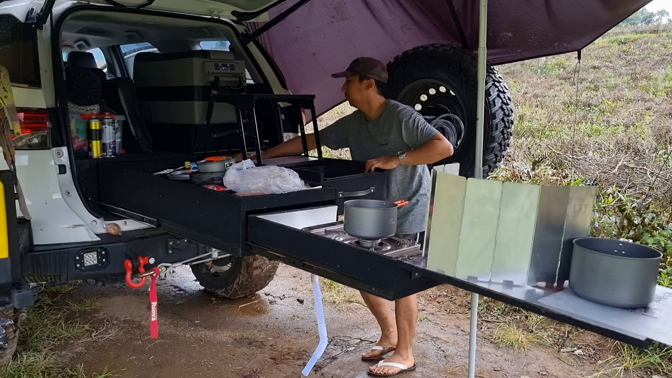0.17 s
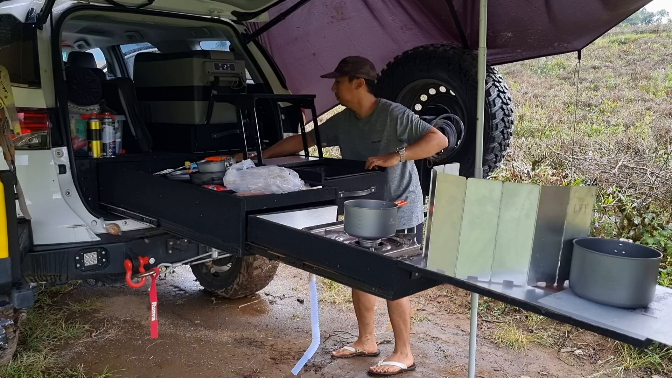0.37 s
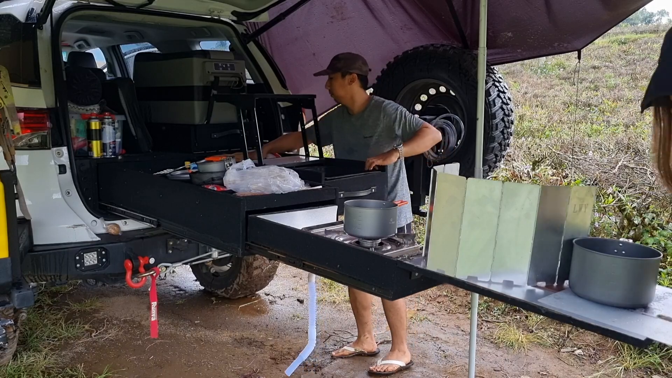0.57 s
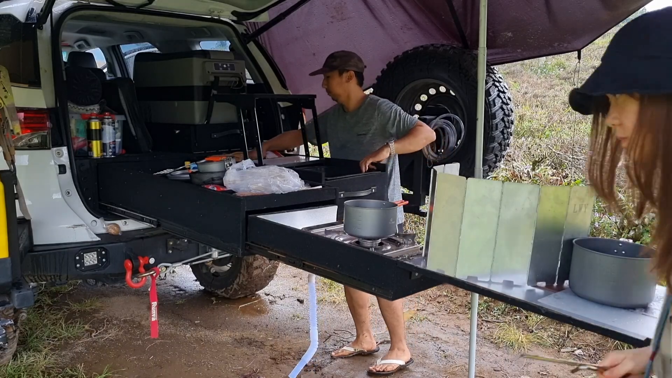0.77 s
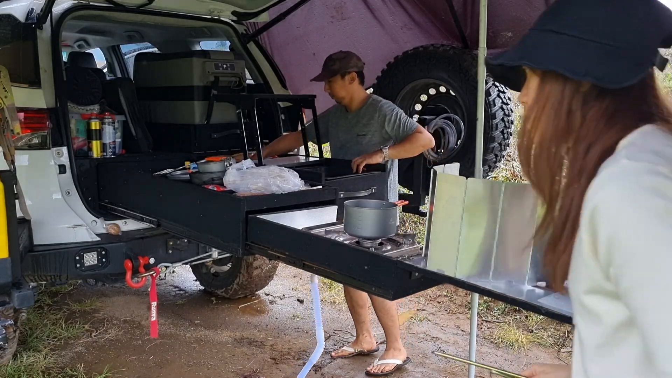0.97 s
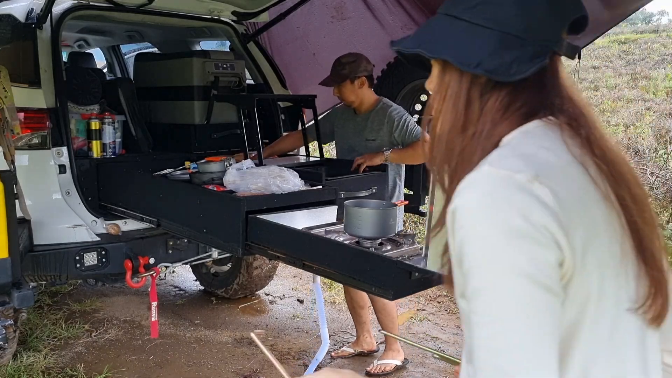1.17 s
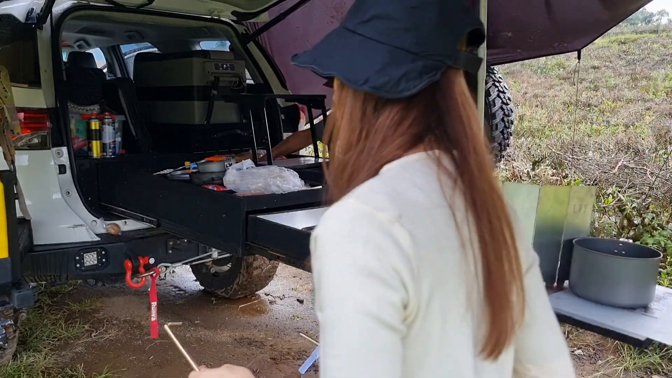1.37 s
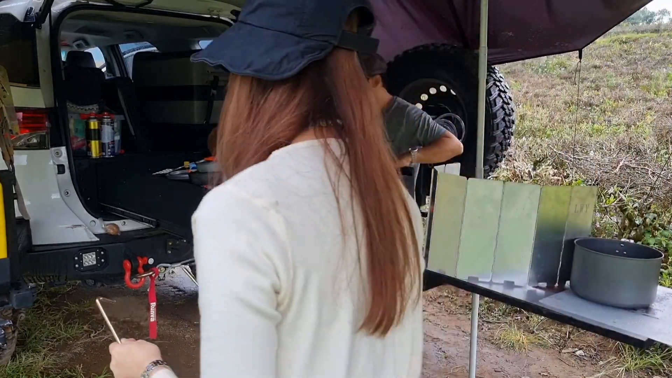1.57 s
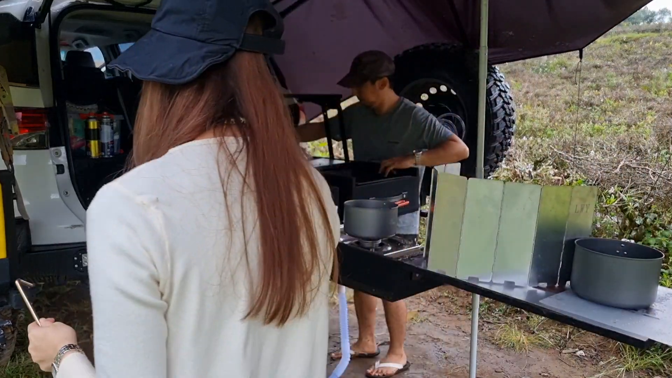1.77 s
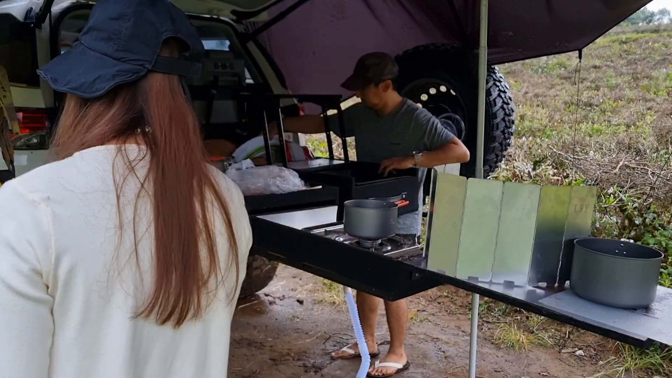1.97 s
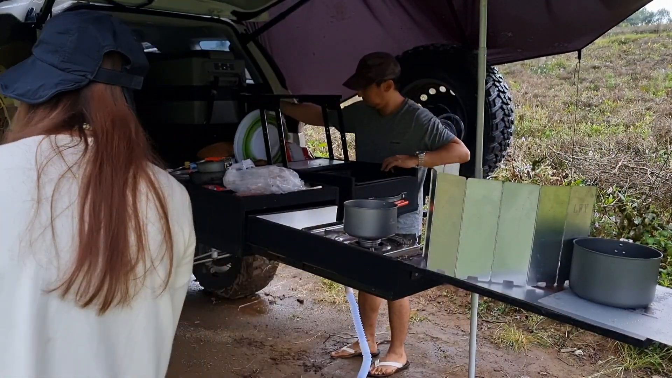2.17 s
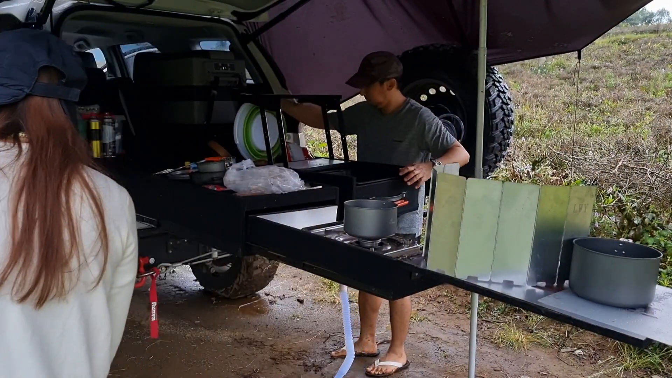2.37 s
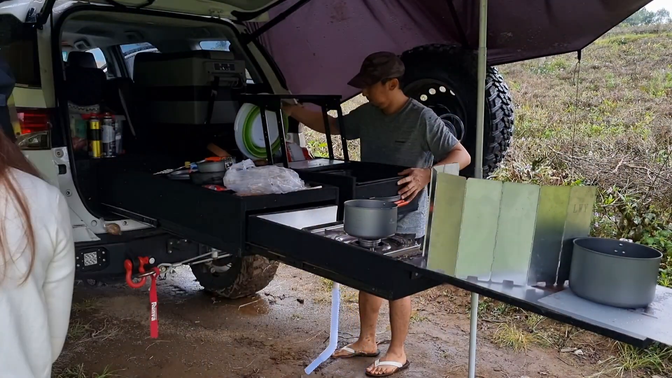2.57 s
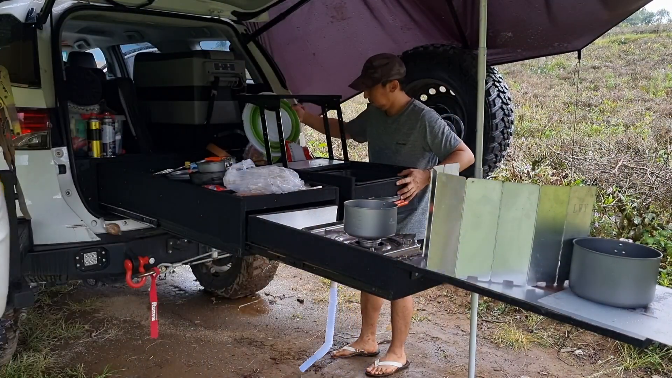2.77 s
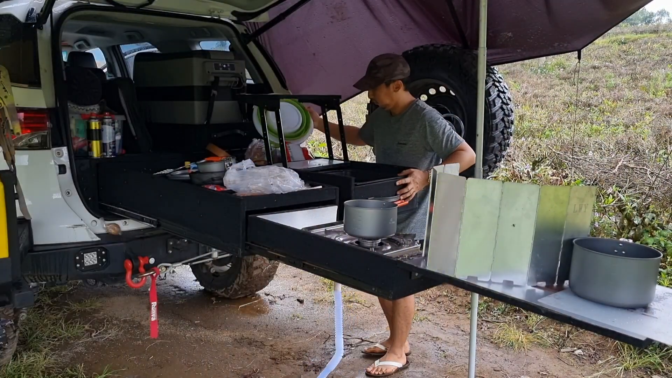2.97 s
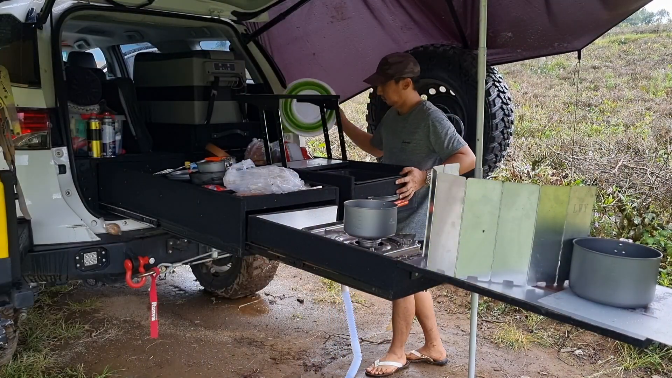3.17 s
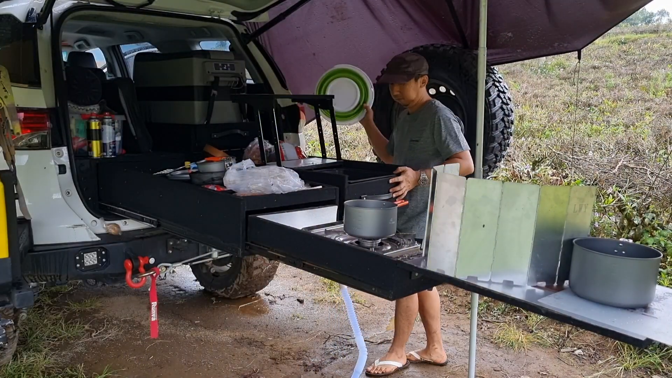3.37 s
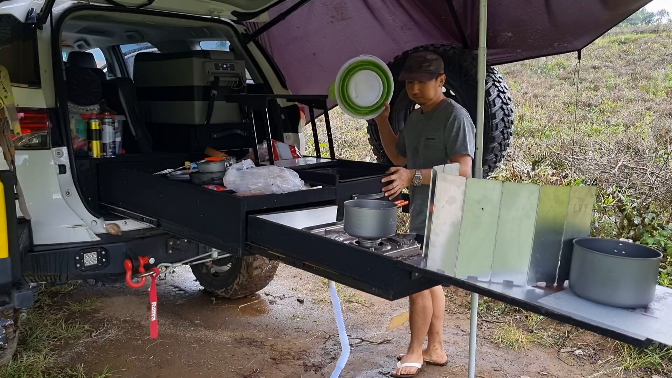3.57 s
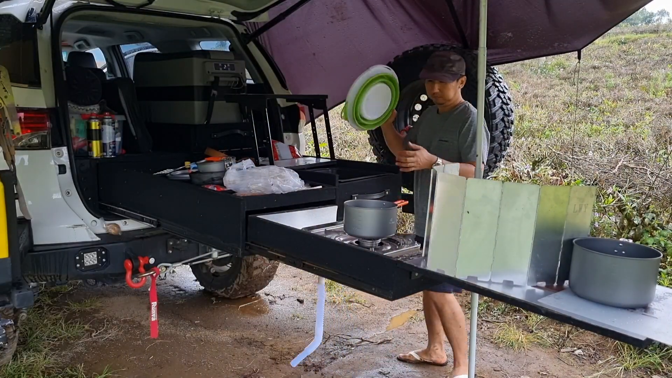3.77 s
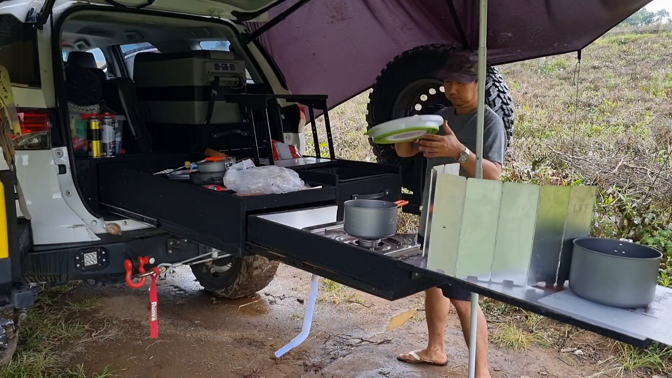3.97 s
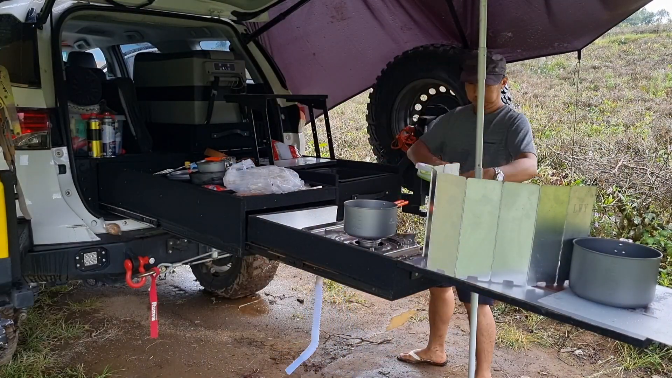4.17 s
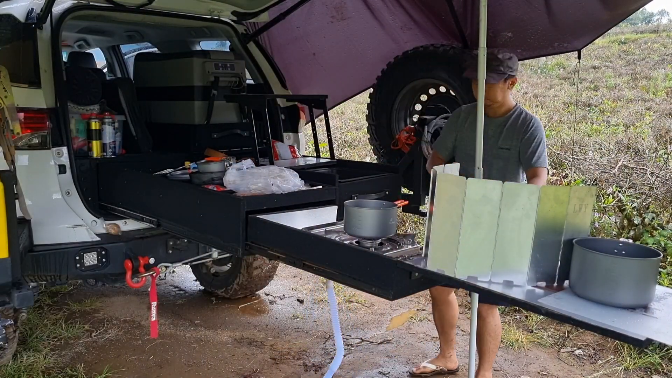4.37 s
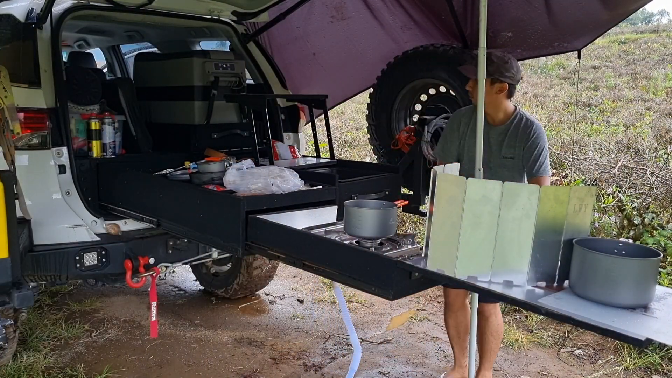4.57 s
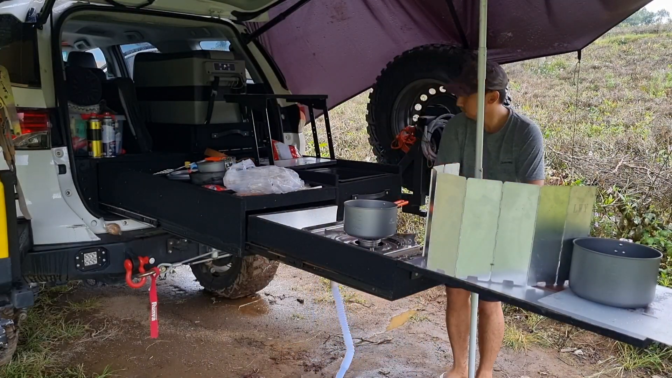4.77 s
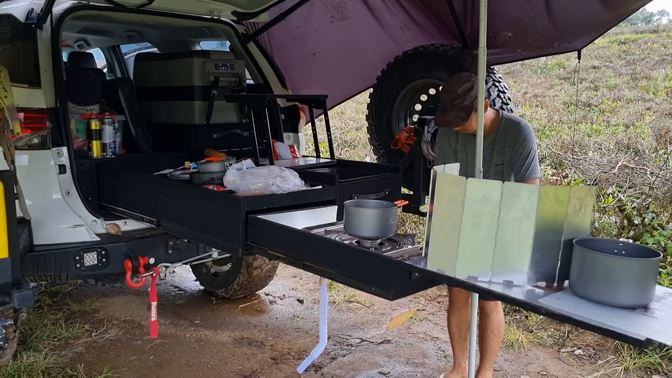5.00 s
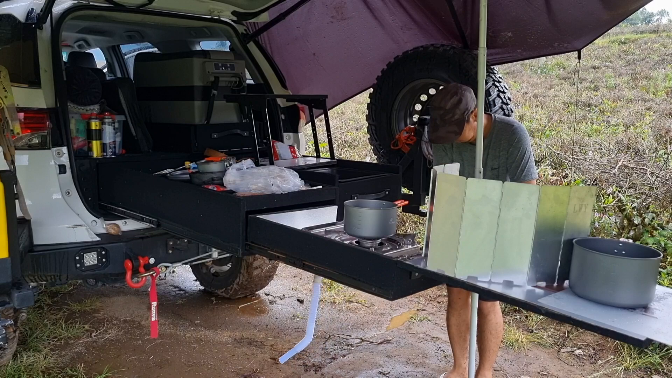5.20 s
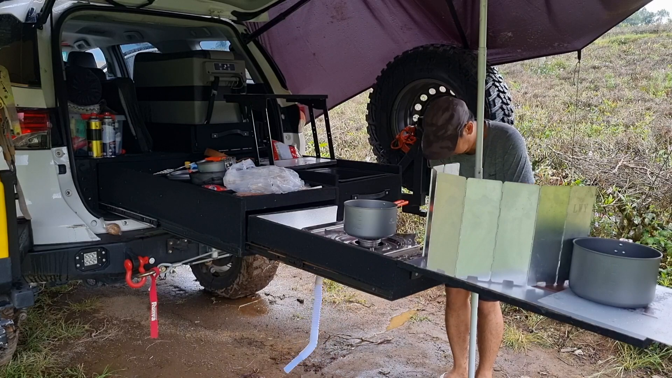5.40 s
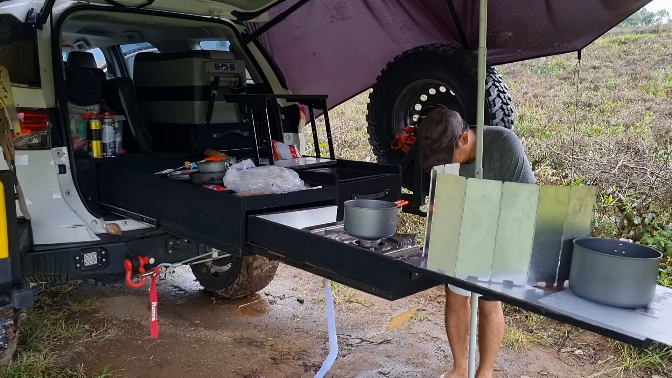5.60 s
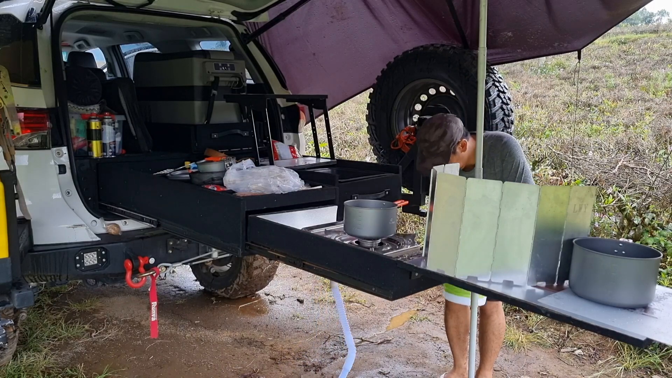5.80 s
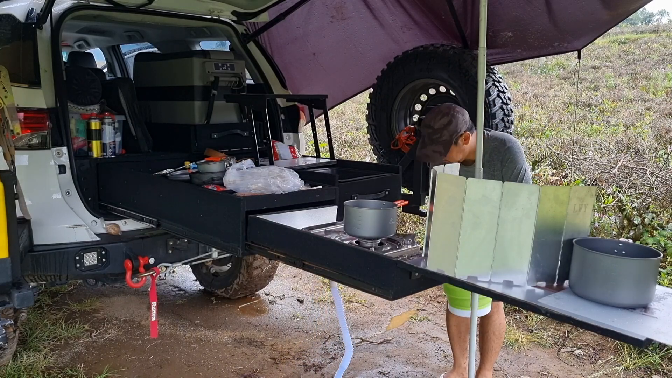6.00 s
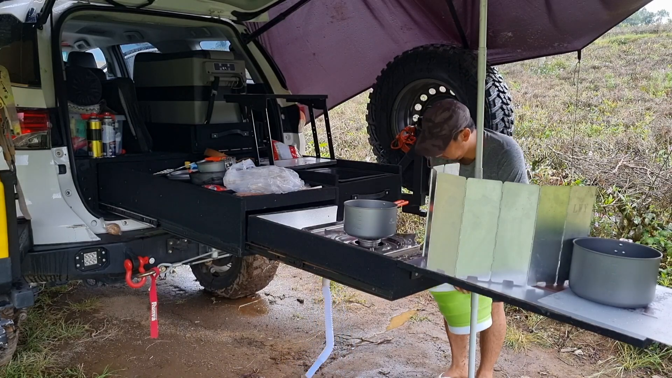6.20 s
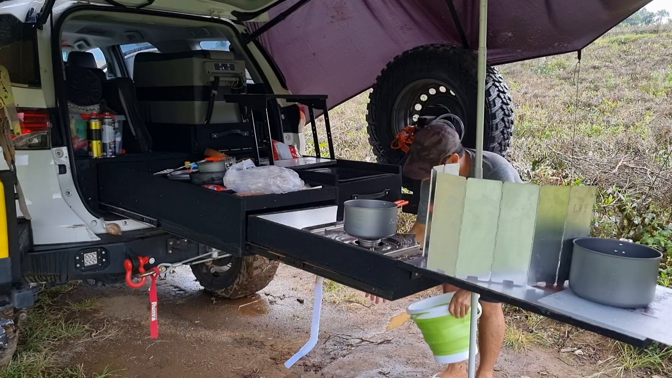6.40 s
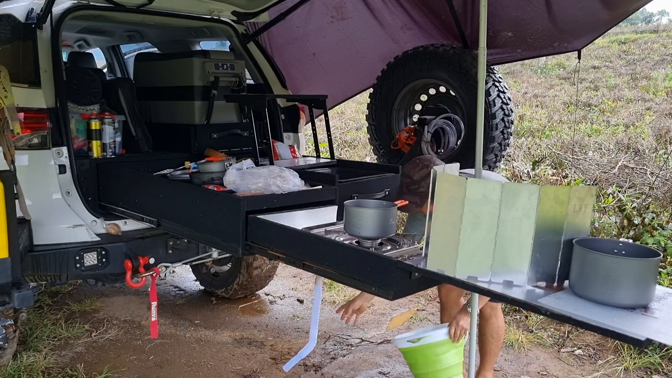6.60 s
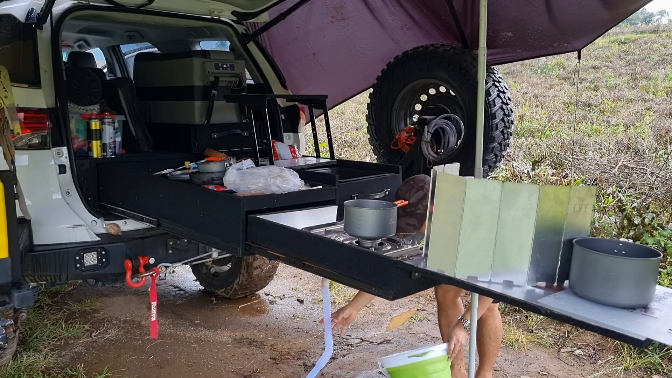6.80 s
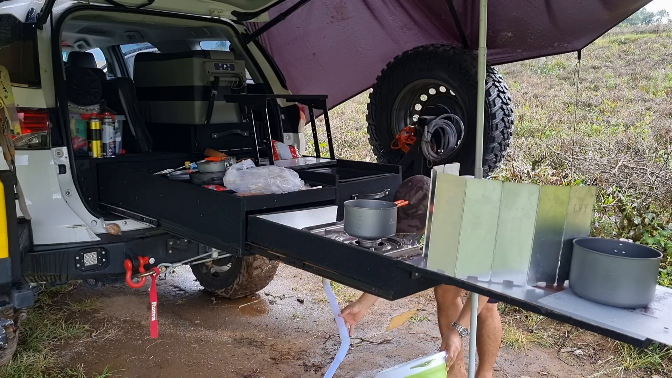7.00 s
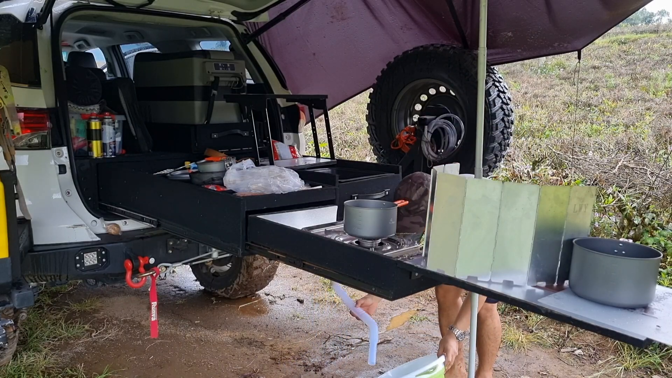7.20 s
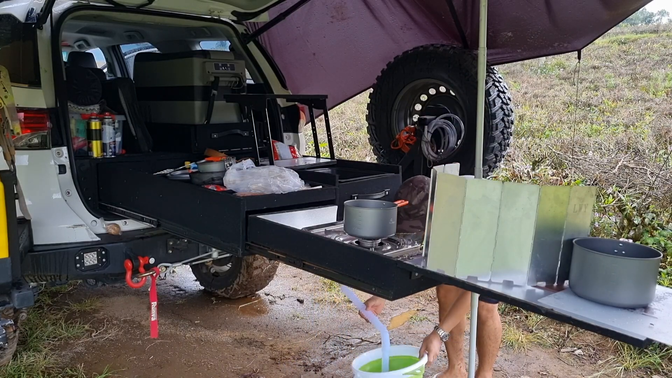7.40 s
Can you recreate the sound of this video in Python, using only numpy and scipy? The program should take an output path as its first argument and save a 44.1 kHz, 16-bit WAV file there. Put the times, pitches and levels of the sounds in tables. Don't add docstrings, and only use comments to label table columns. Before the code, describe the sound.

Crisp, uneven grass crunches and twig snaps fill the first seconds, mixed with dull plastic and wooden knocks, soft thuds and rubbing gear. The steps thin out; bright metal rods jingle and a sharp clack strikes. Later a collapsible plastic bucket gives several low, hollow pops, followed by a few faint metal ticks. Breeze, high insects and distant birds surround it in an open field, picked up by a small nearby camera microphone.

```python
import sys
import numpy as np
from scipy import signal
from scipy.fft import rfft, irfft, next_fast_len
from scipy.io import wavfile
from scipy.ndimage import uniform_filter1d

SR = 44100
rng = np.random.default_rng(int(sys.argv[2]) if len(sys.argv) > 2 else 0)


def unload_wav(signal):
    wavfile.write(
        sys.argv[1],
        SR,
        np.round(np.clip(np.atleast_2d(signal).T, -1, 1) * 32767).astype(np.int16),
    )


def volts_from_db(level):
    exponent = np.asarray(level, float) / 20
    return 10 ** exponent


N = 328545
T = np.arange(N) / SR

# frequency in Hz, level in dB per Hz.
AIR_SPECTRUM = [(15, -32), (25, -0.5), (114, 5.5), (217, -10), (326, -17), (373, -21.5), (775, -24),
                (1560, -32), (3430, -28.5), (5500, -45.5), (7920, -31.5), (9840, -54), (16000, -56)]
AIR_DB = -54.5
# resonance in Hz, width in Hz, wing strokes per second, level in dB.
INSECT_CHORUSES = [(6420, 200, 130, -80.5), (8100, 550, 88, -77)]

# start in seconds, hold in seconds, level in dB.
GRASS_SWISHES = [(0, 0.0066, -54.5), (.08, 0.086, -60), (.19, 0.2, -55.5), (.35, 0.31, -57), (.7, 0.1, -57),
                 (.82, 0.088, -55.5), (.9, 0.12, -61.5), (1.16, 0.11, -61), (1.3, 0.027, -54.5),
                 (1.42, 0.17, -58.5), (1.6, 0.084, -55), (1.8, 0.12, -45), (2.04, 0.028, -58),
                 (2.13, 0.035, -46), (2.3, 0.326, -66.5), (2.76, 0.057, -58.5), (3.18, 0.17, -68.5),
                 (3.62, 0.24, -58), (3.76, 0.11, -63), (4.3, .35, -66.5), (4.7, 0.96, -74.5),
                 (5.7, 0.03, -71), (5.8, .55, -78)]
# start in seconds, hold in seconds, level in dB,
# level of the hard edge above it in dB.
DRAWER_DRAGS = [(0, 0.017, -59, 4), (.15, 0.076, -64, 8.5), (.4, 0.085, -50.5, 0.5), (.54, 0.22, -58, -1.5),
                (0.916, 0.035, -55, 3), (1.261, 0.24, -43.5, -9.5), (1.46, 0.17, -39.5, -11.5),
                (1.7, 0.27, -50, -2.5), (2.134, 0.039, -45.5, 1), (2.26, 0.17, -63, 4.5),
                (2.44, 0.061, -55.5, -29), (2.64, 0.19, -54.5, -43), (3.24, 0.24, -50, -22),
                (3.55, 0.32, -59, -5.5), (3.9, 0.88, -61, -16.5), (4.7, 0.72, -67, -7),
                (5.5, 0.22, -57.5, -7.5), (5.801, 0.18, -66.5, -9)]
# frequency in Hz, width in Hz, level in dB.
DRAWER_MODES = [(223, 31, 0.5), (274, 40, 1.5), (339.4, 47, 5), (477, 90, -8), (527, 26, -2)]
SWELL_DB_PER_S, FADE_DB_PER_S = 162, 192
STILL_GRASS_DB, STILL_DRAWER_DB, STILL_EDGE_DB = -77.5, -73, -101
TREBLE_DB, TREBLE_FOLLOWS = -65.5, 0.95

# start in seconds, peak in dB, centre in Hz, width in octaves.
DULL_KNOCKS = [(.015, -42, 1210, 1.6), (0.517, -60, 900, 1.9), (0.597, -34, 810, 0.62),
               (1.576, -47, 840, 4.4), (2.012, -37.5, 1380, 0.57), (2.11, -28, 1490, 1.7),
               (2.337, -40.5, 1280, 1.1), (2.693, -42.5, 820, 3.4), (3.621, -40.5, 1070, 0.66),
               (3.74, -44, 1400, 2.3), (3.749, -21.5, 1370, 3.5), (3.743, -23, 756, 0.42),
               (5.181, -31, 920, 0.21), (.25, -41, 1910, 0.55), (4.428, -41, 1700, 0.65),
               (2.918, -47, 1880, 3.7), (4.42, -34.5, 1650, 1.7), (4.726, -43.5, 928, 0.54),
               (5.183, -28, 1300, 1.8), (5.395, -36, 870, 1.4), (5.653, -37.5, 890, 3.2),
               (5.907, -44, 1580, 1.8), (5.921, -50.5, 2000, 2), (2.008, -45, 1300, .6),
               (2.345, -40, 700, 1), (5.87, -50.5, 1400, 1.6)]
# start in seconds, peak in dB, centre in Hz, width in octaves.
HARD_TICKS = [(0.942, -42, 2240, 1.1), (1.167, -42, 2580, 1.5), (1.776, -34, 3160, 1.6),
              (2.043, -40.5, 4470, 1.4), (2.391, -33, 2040, 1.9), (5.178, -30.5, 2820, 0.32),
              (4.042, -47, 2000, 0.55), (4.294, -45, 2250, 1.1), (4.532, -51, 3450, 0.82),
              (4.62, -40, 2340, 0.91), (6.21, -48, 3500, 1.8), (6.234, -30.5, 2300, 1.37),
              (6.991, -53, 2760, 0.95), (7.073, -52, 3480, 0.54), (7.047, -56, 2800, 0.89),
              (7.086, -62, 3300, .8), (7.279, -53, 3900, .3), (7.432, -54, 3500, 0.37),
              (6.268, -54, 2800, 1.7), (6.28, -54, 3000, 1), (7.276, -46, 2930, 0.55),
              (7.296, -43, 3900, 0.12), (7.298, -52.5, 2830, .3), (7.306, -64, 3700, .3),
              (7.358, -47.5, 3850, 0.23), (7.361, -48, 2870, 0.44), (7.382, -46, 3870, 0.26),
              (7.385, -48, 3020, 0.33), (7.417, -46.5, 3380, 0.36)]
# start in seconds, peak in dB, centre in Hz, length in seconds.
HEAVY_THUDS = [(0.373, -36, 320, 0.038), (0.708, -34.5, 297, 0.014), (1.329, -28.5, 378, 0.027),
               (1.352, -31, 62.5, 0.022), (2.018, -26, 364, 0.0054), (2.029, -30, 96, 0.011),
               (2.175, -31.5, 596, 0.022), (2.277, -35.5, 475, 0.011), (2.339, -29, 310, 0.066),
               (2.421, -27, 310, 0.022), (2.506, -29.5, 320, 0.032), (3.746, -21.5, 342, 0.024),
               (5.189, -30, 179, 0.014), (5.4, -27, 201, 0.017), (3.325, -38, 270, 0.026),
               (4.725, -38, 340, 0.033), (5.645, -20.5, 90, 0.014)]
KNOCK_S, TICK_S, THUD_OCTAVES = 0.012, 0.016, 1

# start in seconds, peak in dB, length in seconds.
THICK_STALKS = [(0.166, -30, 0.024), (0.228, -28, 0.029), (0.36, -28.5, 0.023), (0.414, -25.5, 0.019),
                (0.464, -29.5, 0.02), (0.625, -32.5, 0.014), (0.881, -33, 0.057), (0.901, -32, 0.029),
                (.981, -35, 0.047), (1.19, -39, 0.04), (1.304, -30.5, 0.08), (1.63, -30.5, 0.055),
                (1.696, -34.5, 0.021), (1.769, -27.5, 0.038), (1.833, -28, 0.015), (1.864, -25.5, 0.041),
                (1.911, -28, 0.036), (2.046, -41, 0.055), (2.11, -26.5, 0.045), (2.132, -24, 0.014),
                (2.148, -37, 0.03), (0.248, -31.5, 0.027), (2.385, -33.5, 0.028), (2.751, -34.5, 0.034),
                (2.813, -35, 0.01), (4, -48, 0.039), (3.734, -28.5, 0.027)]
# start in seconds, peak in
# dB, length in seconds.
THIN_STRAWS = [(0.516, -23, 0.0078), (0.742, -29.5, 0.026), (2.496, -39.5, 0.037), (3.095, -41.5, 0.038),
               (4.488, -34, 0.02), (4.588, -38.5, 0.028), (4.517, -43, 0.0082), (4.899, -40.5, 0.039),
               (5.7, -46, 0.022), (5.4, -46, 0.022), (5.982, -36, 0.019), (5.8, -49, .035),
               (5.179, -31.5, 0.0063), (0.592, -40, 0.016), (6.661, -47, 0.0073), (6.24, -46, 0.044),
               (1.81, -24, .015), (1.325, -28, 0.025)]
STALK_TILT_DB, STRAW_TILT_DB = -8.5, -2.5

# start in
# seconds, peak in dB, centre in Hz.
SHARP_CRACKS = [(0.1852, -35, 3380), (0.2366, -35, 3070), (0.2624, -35, 2050), (0.371, -36, 4360),
                (0.416, -33, 2410), (0.4667, -31.5, 5360), (0.515, -28.5, 3120), (0.602, -37, 2400),
                (0.6225, -32, 3900), (0.711, -38, 3700), (0.7421, -33, 3660), (0.8245, -32, 2100),
                (0.85, -36.5, 2500), (0.911, -41, 2530), (0.988, -38, 5690), (1.0149, -32, 2600),
                (1.1187, -42, 2630), (1.169, -35, 2850), (7.162, -52, 8870), (1.5377, -30, 2140),
                (1.6386, -34, 4150), (1.6927, -29, 2260), (1.728, -29, 2050), (1.7761, -23, 3060),
                (1.8448, -26, 3120), (1.8727, -26, 3070), (1.924, -32, 3750), (2.0443, -33.5, 2670),
                (2.1181, -28, 4340), (2.138, -37, 4670), (2.3891, -33, 2730), (2.7546, -33, 2630),
                (2.819, -34.5, 3900), (3.1562, -28.5, 6430), (3.745, -19, 1990), (4.3242, -26.5, 6910),
                (4.5251, -41, 5570), (4.5451, -44, 3470), (4.8152, -50, 4860), (5.1818, -31.5, 2800),
                (5.264, -40.5, 4270), (5.9825, -29.5, 6200), (6.2108, -38, 2310), (6.8048, -54, 2860),
                (6.844, -44, 4420), (7.0485, -58, 3740), (6.355, -58, 3000), (6.449, -53, 2900),
                (6.627, -51, 2900), (1.577, -38, 3200)]
SNAP_S, SNAP_OCTAVES, SNAP_DB = 0.0013, 1.7, -5.5
SNAP_DIRECT_DB = -9.5

# time in seconds, centre in Hz, level in dB.
SOLE_SQUEAK = [
    (1.19, 6250, -60.5),
    (1.3, 6850, -54),
    (1.35, 7500, -43.5),
    (1.365, 8370, -37.5),
    (1.385, 8360, -55),
    (1.44, 8100, -68),
]

# start in seconds, peak in dB, level of the second peg in dB,
# tilt in dB per octave, rattle in seconds.
LOOSE_CLINKS = [(3.1218, -40, -6, -1, 0.087), (3.1534, -34, -4, 18, 0.012), (3.1765, -40, -19, 6, 0.0053),
                (3.252, -42, 8, 13, 0.018), (3.38, -50, -2, 0, 0.021), (3.4084, -51, -3, -1, 0.036),
                (3.5656, -40, -2, 4, 0.044), (4.321, -35.5, 5, 7, 0.0067), (4.331, -32.5, 13, 8, 0.014),
                (4.347, -31.5, 13.5, 9, 0.025), (4.362, -44, -1, 7, 0.01), (4.6153, -53, 7, -4, 0.024),
                (4.81, -44.5, 10.5, 15, 0.022), (5.031, -61, 3, 2, 0.012), (5.614, -36, 9, 2.5, 0.022),
                (5.7232, -59, 9, -4, 0.015), (6.8439, -49, -15, 0, 0.0082), (6.9358, -54, -7, 4, 0.0064),
                (7.159, -54, -11, 7, 0.006), (7.352, -54.5, 7, -3, 0.011)]
# start in seconds, peak in dB, level of the second peg in dB,
# tilt in dB per octave, rattle in seconds.
GRIPPED_CLINKS = [
    (5.981, -35.5, -9, 4.5, 0.011),
    (5.995, -39, -3, 6, 0.016),
    (5.802, -58, -2, 0, 0.017),
    (5.822, -45.5, -4, -0.5, 0.027),
    (5, -43, 0, 0, 0.025),
    (7.416, -57, -4, -3, .015),
    (6.995, -60, 0, 4, .004),
]
# frequency in Hz, level in dB, decay time (60 dB) in seconds.
FIRST_PEG_MODES = [(2680, -14, 0.12), (4010, -32, 0.11), (4410, -6, 0.09), (6414, -6.5, 0.18),
                   (8870, -7.5, 0.17), (9900, -13.5, 0.17), (11510, -8, 0.16), (13100, -27, .1),
                   (14490, -11.5, 0.16), (14900, -21, 0.15), (15670, -23, .1)]
# frequency in Hz, level in dB, decay time (60 dB) in seconds.
SECOND_PEG_MODES = [(3360, -10, 0.15), (4826, -1.5, 0.087), (5730, -15.5, .06), (6890, -3.5, 0.11),
                    (7500, -12.5, 0.066), (9280, -3, 0.17), (10360, -17, 0.08), (12128, -6.5, 0.13),
                    (13540, -22, 0.07), (14200, -16, .08), (15080, -8, 0.11)]
FREE_RING, GRIP_RING = 0.9, 0.38
STRIKE_SCATTER_DB = 1.5
BUZZ_DB, BUZZ_T60_S, BUZZ_SPREAD = 4.5, 0.035, .012
# start in seconds, frequency in Hz, level in dB,
# decay time (60 dB) in seconds.
SINGING_PARTIALS = [(3.157, 6433, -37, 0.25), (3.161, 4840, -50, .12), (3.16, 2650, -56, 0.078),
                    (3.2, 3270, -63, 0.087), (5.621, 3600, -49.5, 0.17), (3.569, 4400, -45, 0.077),
                    (4.327, 2635, -51.5, 0.29), (4.33, 4340, -47, .12), (4.813, 4845, -46, 0.077),
                    (7.161, 8870, -58, 0.095), (5.617, 4845, -46, 0.27), (5.828, 4450, -56, .08),
                    (5.63, 12125, -59, 0.28), (5.625, 15180, -49, .14), (4.815, 11500, -57, .2),
                    (7.085, 4845, -72, .08), (4.335, 3320, -47.5, 0.27), (6.846, 4377, -50, .07),
                    (3.798, 806, -36.5, 0.065), (3.84, 800, -50, .1), (5.392, 624, -29.5, 0.078),
                    (5.651, 690, -28, 0.027)]

# time in seconds, pitch in Hz, level in dB.
BIRD_CALLS = [
    [(3.86, 1890, -60), (3.89, 2240, -69), (3.915, 2533, -54), (3.95, 2770, -66)],
    [(4.99, 2480, -73), (5.03, 3160, -76), (5.1, 2830, -71), (5.17, 2640, -79)],
    [(5.32, 1790, -77), (5.36, 3080, -64), (5.39, 3660, -66), (5.42, 4030, -65), (5.45, 3550, -66),
     (5.48, 2690, -71), (5.52, 3060, -68)],
    [(5.66, 3110, -63), (5.69, 2400, -65), (5.73, 1576, -66)],
    [(5.78, 2900, -86), (5.87, 3280, -82)],
    [(6.86, 3700, -76), (6.93, 3480, -86), (7.0, 3070, -83)],
    [(7.185, 3510, -74), (7.2, 3300, -71), (7.225, 3000, -86)],
    [(7.335, 1380, -76), (7.365, 1380, -80)],
]

# start in seconds, peak in dB, pitch in Hz, swell in seconds.
BUCKET_POPS = [(5.1744, -15.5, 397, 0.0052), (5.199, -38.5, 430, 0.0051), (5.341, -36.5, 397, 0.0056),
               (5.388, -23.5, 394, 0.0048), (5.397, -20.5, 323, 0.0048), (5.409, -25.5, 430, 0.0052),
               (5.43, -36.5, 356, 0.0066), (5.479, -22, 349, 0.0061), (5.489, -12.5, 339, 0.0047),
               (5.505, -21, 382, 0.0045), (5.524, -37, 317, 0.0047), (5.601, -38, 390, 0.0046),
               (5.644, -13.5, 310, 0.0068), (5.654, -19.5, 273.5, 0.0063), (5.666, -27.5, 262, 0.009),
               (5.684, -37, 290, 0.0099), (5.713, -41, 356, 0.011), (5.917, -42, 377, 0.009),
               (6.233, -32, 348, 0.0057)]
SNAP_SHARPNESS = 2.53

AWNING_T60_S, AWNING_DB, AWNING_HZ = 0.046, 5.5, 598


def unit(x):
    return x / np.sqrt(np.mean(x ** 2))


def band(x, hz, width):
    hz = np.clip(hz, 30, .45 * SR)
    return signal.lfilter(*signal.iirpeak(hz, hz / max(width, 5), SR), x)


def curve(table):
    s, *columns = np.transpose(table)
    return [np.interp(T, s, c) for c in columns]


def walk(rate):
    k = int(SR / rate)
    held = np.repeat(rng.standard_normal(N // k + 1), k)
    return 1.55 * uniform_filter1d(uniform_filter1d(held, k), k)[:N]


def grains(spread_db):
    size_db = spread_db * np.minimum(rng.exponential(size=N), 6.5)
    return unit(rng.standard_normal(N) * volts_from_db(size_db))


def add(out, s, x, pan_db=3.5):
    i = int(s * SR)
    x = x[:N - i]
    out[:, i:i + len(x)] += x * volts_from_db(np.array([[pan_db / 2], [-pan_db / 2]]))


def burst(noise, s, length, rise=0.00093, tail=0.):
    t = np.arange(int((3 * length + tail) * SR) + 64) / SR
    piece = np.take(noise, int(s * SR) + np.arange(len(t)), mode="wrap")
    return piece * (1 - np.exp(-t / rise)) * np.exp(-(t / length) ** 1.21)


def moves(rows, still_db):
    t = T[::100]
    s, held, db = np.transpose(rows)[:, :, None]
    before, after = SWELL_DB_PER_S * (s - t), FADE_DB_PER_S * (t - s - held)
    db = db - np.maximum(0, np.maximum(before, after))
    return np.interp(T, t, 10 * np.log10(volts_from_db(2 * still_db) + volts_from_db(2 * db).sum(axis=0)))


def whistle(table):
    hz, db = curve(table)
    gate = np.clip(np.minimum(T - table[0][0], table[-1][0] - T) / 0.0043, 0, 1)
    return gate * volts_from_db(db) * np.sin(2 * np.pi * np.cumsum(uniform_filter1d(hz, 700)) / SR)


def air():
    hz = np.fft.rfftfreq(N, 1 / SR) + 1
    table_hz, table_db = np.transpose(AIR_SPECTRUM)
    colour = volts_from_db(np.interp(np.log(hz), np.log(table_hz), table_db))
    mid, side = (rfft(rng.standard_normal(N)) * colour for _ in range(2))
    side = side * np.clip(hz / 1100, .11, 1)
    both = unit(irfft(np.array([mid + side, mid - side]), N))
    bass = band(both, 102, 150)
    return volts_from_db(AIR_DB) * (both + bass * (volts_from_db(1.4 * walk(6)) - 1))


def insects():
    out = 0
    for hz, width, rate, db in INSECT_CHORUSES:
        phase = np.pi * np.cumsum(rate * (1 + 0.0189 * walk(4.2))) / SR
        strokes = 0.48 + np.cos(phase) ** 4
        level = volts_from_db(db + 2.0 * walk(2.07))
        ringing = band(strokes * rng.standard_normal((2, N)), hz, width)
        out = out + level * unit(band(ringing, hz, 2 * width))
    return out


def rustle():
    mid_db = moves(GRASS_SWISHES, STILL_GRASS_DB)
    low_db = moves([r[:3] for r in DRAWER_DRAGS], STILL_DRAWER_DB)
    top_db = TREBLE_DB + TREBLE_FOLLOWS * (mid_db + 56.5)
    edge_db = moves([(s, held, db + over_db) for s, held, db, over_db in DRAWER_DRAGS], STILL_EDGE_DB)
    noise = grains(4.6) * volts_from_db(2.0 * walk(45))
    grass_bands = ((1800, mid_db - 26.0), (3600, mid_db - 3.5),
                   (7000, (mid_db + top_db) / 2 - 35.0), (12500, top_db - 4.0))
    grass = sum(volts_from_db(db + 1.2 * walk(24.62)) * unit(band(noise, hz, 0.5 * hz)) for hz, db in grass_bands)
    rub = grains(1.54) * volts_from_db(1.64 * walk(60))
    modes = sum(volts_from_db(db) * band(rub, hz, width) for hz, width, db in DRAWER_MODES)
    drawer = volts_from_db(low_db - 3.5) * unit(band(modes, 343, 355))
    edge = volts_from_db(edge_db - 1.5) * unit(band(band(rub, 483, 870), 483, 870))
    ground = volts_from_db(0.67 * low_db - 31.5) * unit(band(rub, 80, 54))
    return grass + drawer + edge + ground


def knocks():
    out, noise = np.zeros((2, N)), grains(1.64)
    hits = [(*r, KNOCK_S) for r in DULL_KNOCKS] + [(*r, TICK_S) for r in HARD_TICKS]
    hits += [(s, db, hz, THUD_OCTAVES, length) for s, db, hz, length in HEAVY_THUDS]
    for s, db, hz, octaves, length in hits:
        width = hz * np.clip(octaves, .05, 3) * 0.58
        x = burst(noise, s, np.clip(length, .002, .1), rise=0.00032, tail=.02)
        x[40:52] *= 3.
        x = band(band(x, hz, 1.65 * width), hz, 1.65 * width)
        x = band(x, hz, 2 * width) * np.sqrt(SR / 4 / width)
        add(out, s - .001, volts_from_db(db - 8.0) * x, -1.5)
    return out


def crunches():
    out, noise = np.zeros((2, N)), grains(4.4) * volts_from_db(2.2 * walk(250))
    breaks = [(*r, STALK_TILT_DB) for r in THICK_STALKS] + [(*r, STRAW_TILT_DB) for r in THIN_STRAWS]
    for s, db, length, tilt_db in breaks:
        length = np.clip(length, .003, .15)
        x = burst(noise, s, length, rise=0.39 * length)
        x = sum(volts_from_db(tilt_db * np.log2(hz / 4000)) * band(x, hz, hz * 1.1)
                for hz in (1250, 2200, 4000, 8000, 14000))
        add(out, s - .001, volts_from_db(db - 23.0) * x, -2.2)
    return out


def snaps():
    out, noise = np.zeros((2, N)), rng.standard_normal(N)
    for s, db, hz in SHARP_CRACKS:
        x = burst(noise, s, np.clip(SNAP_S, .0005, .006), rise=0.00064, tail=.004)
        x = band(band(x, hz, hz * SNAP_OCTAVES), hz, hz * SNAP_OCTAVES)
        add(out, s - .0005, volts_from_db(db + SNAP_DB) * x / np.abs(x).max(), -1.5)
    return out


def squeak():
    return whistle(SOLE_SQUEAK) * unit(band(rng.standard_normal(N), 90, 340))


def pegs():
    out, noise, t = np.zeros((2, N)), grains(3.6), np.arange(4500) / SR
    hz, mode_db, t60 = np.transpose(FIRST_PEG_MODES + SECOND_PEG_MODES)[:, :, None]
    which = np.repeat([[-.5], [.5]], [len(FIRST_PEG_MODES), len(SECOND_PEG_MODES)], axis=0)
    turn, early = 2 * np.pi * hz * t, slice(1500)
    pair = np.sin(turn) + 0.25 * np.sin(turn * .992)
    free, gripped = (volts_from_db(-60 * t / t60 / share) * pair for share in (FREE_RING, GRIP_RING))
    clashes = [(*r, free) for r in LOOSE_CLINKS] + [(*r, gripped) for r in GRIPPED_CLINKS]
    for s, db, second_db, tilt_db, rattle, rods in clashes:
        strike, detune = rng.standard_normal((2, len(hz), 1))
        chatter = burst(noise, s, np.clip(rattle, .002, .08), rise=0.0003)
        chatter = chatter / np.sqrt(np.sum(chatter ** 2))
        tilt = tilt_db * np.log2(hz / 9000)
        size = volts_from_db(mode_db + STRIKE_SCATTER_DB * strike + which * second_db + tilt)
        buzz = sum(np.sin(turn[:, early] * (1 + BUZZ_SPREAD * off)) for off in (detune, -strike))
        ring = np.sum(size * rods, axis=0)
        ring[early] += volts_from_db(BUZZ_DB - 60 * t[early] / BUZZ_T60_S) * np.sum(size * buzz, axis=0)
        ring[:2] += volts_from_db(21.0) * np.array([1, -1])
        add(out, s - .0005, volts_from_db(db - 17.5) * signal.fftconvolve(chatter, ring), -1.6)
    return out


def singing():
    out, t = np.zeros((2, N)), np.arange(12000) / SR
    for s, hz, db, t60 in SINGING_PARTIALS:
        envelope = volts_from_db(db - 60 * t / t60) * (1 - np.exp(-t / 0.00092))
        add(out, s, envelope * np.sin(2 * np.pi * hz * t))
    return out


def birds():
    blur = unit(band(rng.standard_normal(N), 70, 156))
    return (1.23 + 0.3 * walk(130) + 0.6 * blur) * sum(whistle(call) for call in BIRD_CALLS)


def pops():
    out, t = np.zeros((2, N)), np.arange(4000) / SR
    for s, db, hz, swell in BUCKET_POPS:
        u = t / np.clip(swell, .002, .03)
        turn = 2 * np.pi * hz * t * (1 - 1.2 * t)
        envelope = (u * np.exp(1 - u)) ** SNAP_SHARPNESS
        wall = volts_from_db(-18.0) * np.exp(-.6 * u) * np.sin(1.656 * turn)
        add(out, s, volts_from_db(db) * envelope * (np.sin(turn) + wall), -2.2)
    return out


def awning(x, size=1024):
    t, out = np.arange(size) / SR, np.pad(x, ((0, 0), (0, 4 * size)))
    starts = np.arange(0, N, size)
    tails = rng.standard_normal((len(starts), 2, size)) * volts_from_db(-60 * t / AWNING_T60_S) * (t > .001)
    tails = signal.sosfilt(signal.butter(2, AWNING_HZ, "high", fs=SR, output="sos"), tails)
    tails = volts_from_db(AWNING_DB) * tails / np.sqrt(np.sum(tails ** 2, axis=2, keepdims=True))
    source, fade = out.copy(), np.hanning(2 * size)
    for i, tail in zip(starts, tails):
        piece = source[:, i:i + 2 * size] * fade
        out[:, i:i + 3 * size - 1] += signal.fftconvolve(piece, tail, axes=1)
    return out[:, :N]


def later(x, lag_s):
    size = next_fast_len(N)
    lags = lag_s * np.array([[.5], [-.5]])
    turn = np.exp(-2j * np.pi * np.fft.rfftfreq(size, 1 / SR) * lags)
    return irfft(rfft(x, size) * turn, size)[:, :N]


def scene():
    brushing = (rustle() + squeak()) * volts_from_db(np.array([[-.7], [.7]]))
    walker = later(crunches() + brushing, 0.00013)
    steel = later(pegs() + singing(), -0.00015)
    near = walker + later(knocks(), 0.0001) + later(pops(), .00004) + later(birds(), 0.00042)
    cracks = later(snaps(), 0.00017)
    outside = volts_from_db(-11.0) * steel + volts_from_db(-14.0) * walker + volts_from_db(SNAP_DIRECT_DB) * cracks
    under = awning(near + cracks + volts_from_db(-1.5) * steel) * volts_from_db(-1.5)
    return under + outside + air() + insects()


def low_pass(x):
    return signal.sosfilt(signal.butter(12, 16820, fs=SR, output="sos"), x)


def record(dry):
    mix = signal.sosfilt(signal.butter(4, 40, "high", fs=SR, output="sos"), dry)
    mix = signal.sosfilt(signal.ellip(8, .3, 45, 15900, fs=SR, output="sos"), mix)
    return low_pass(mix)


dry = scene()
out = record(dry)
unload_wav(out)
```